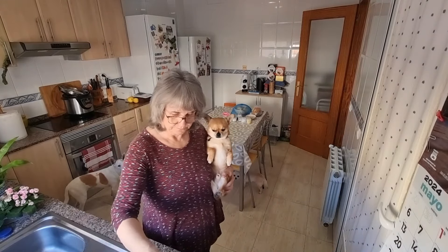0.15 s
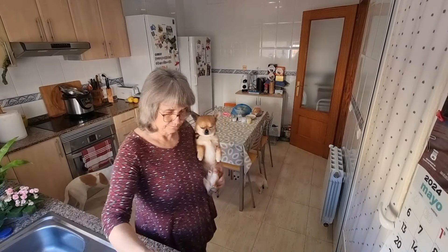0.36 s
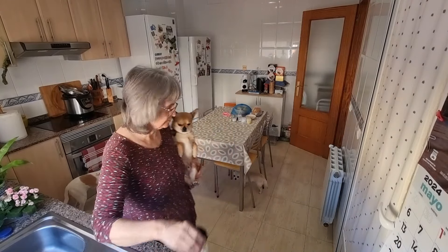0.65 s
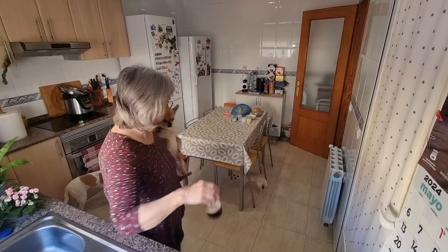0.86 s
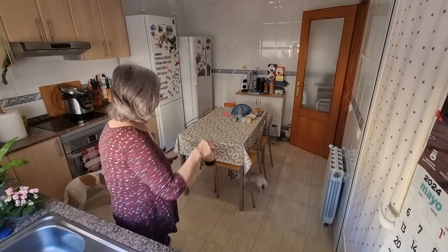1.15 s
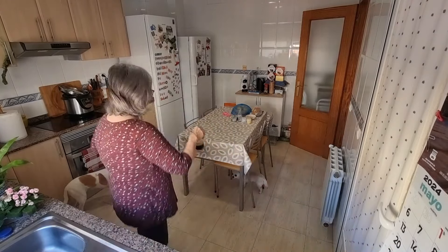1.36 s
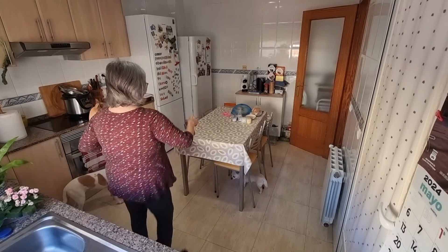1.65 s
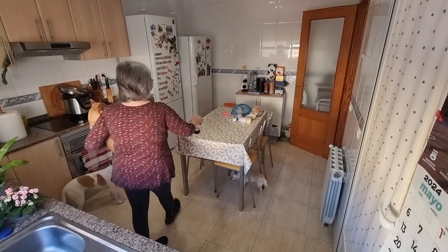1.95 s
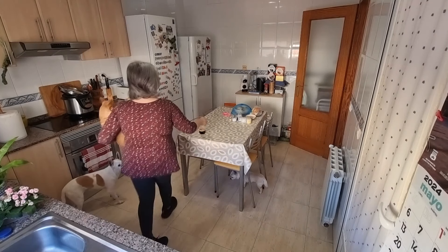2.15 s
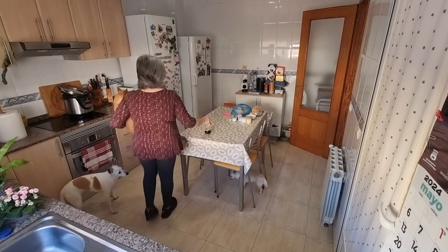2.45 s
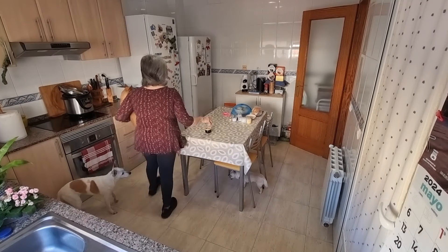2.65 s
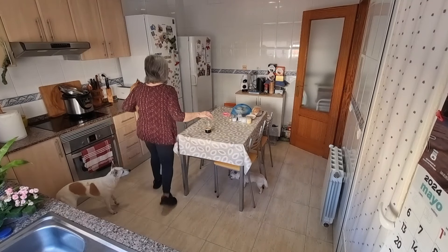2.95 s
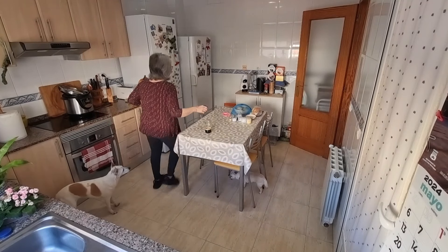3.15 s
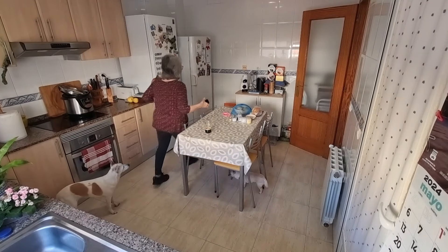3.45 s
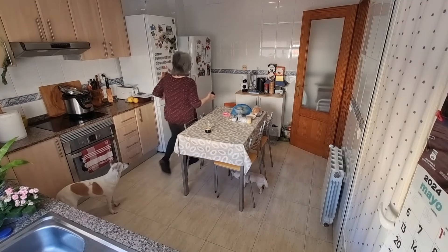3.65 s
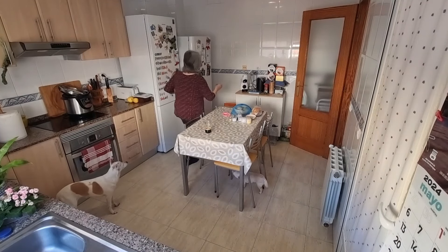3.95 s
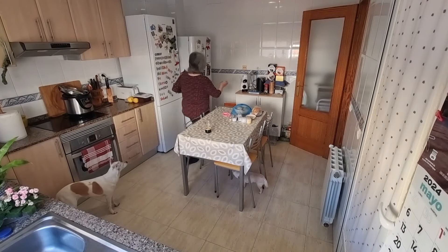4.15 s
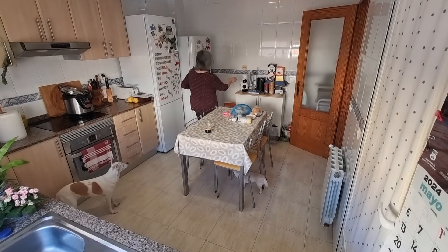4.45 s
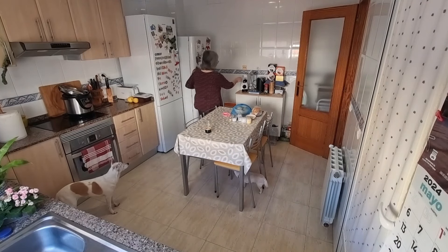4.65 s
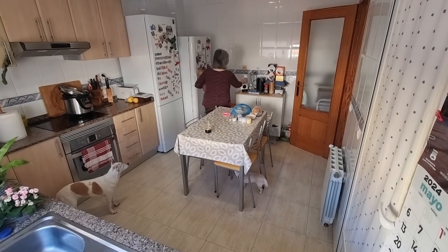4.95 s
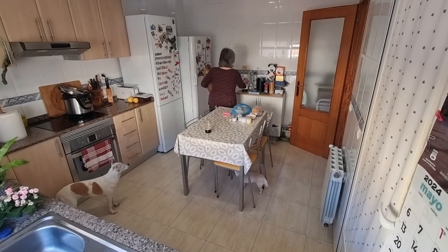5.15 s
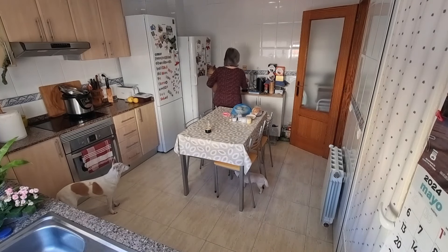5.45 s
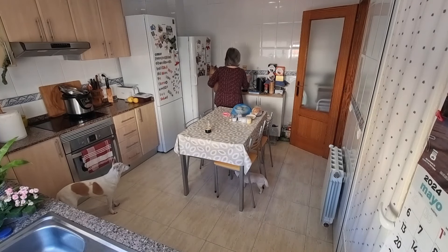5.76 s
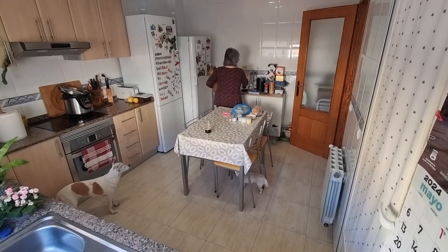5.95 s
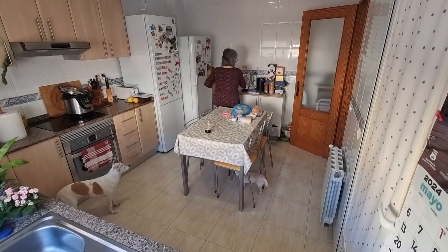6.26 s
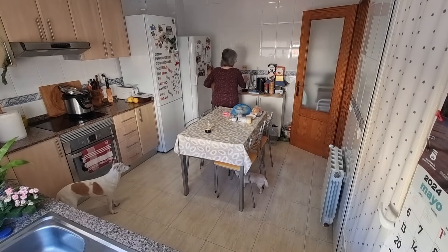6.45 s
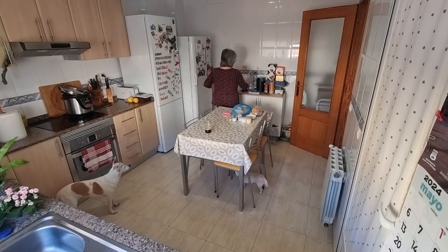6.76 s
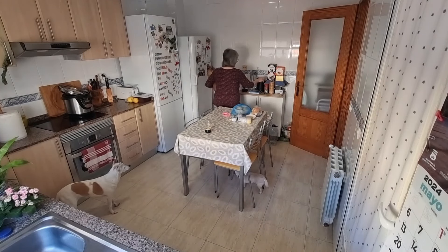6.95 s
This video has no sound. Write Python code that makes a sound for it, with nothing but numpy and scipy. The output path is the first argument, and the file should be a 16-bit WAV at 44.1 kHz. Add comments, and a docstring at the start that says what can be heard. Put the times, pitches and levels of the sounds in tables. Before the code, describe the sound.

In a quiet tiled kitchen, slippered steps and rustling clothes, then a dull cupboard thud, a farther rattling clack and a deep closing boom.

```python
"""Cupboard doors opened and shut in a small tiled kitchen: a dull thud, a farther rattle and clack as one
opens, a closing boom. Every contact excites damped panel modes and a crack that arrives mostly by way of the
hard walls. Someone shuffles about in slippers, clothes rustling: shaped bands of noise and soft resonant
footfalls. Small things tick and tap by the same contact principle; a fridge hums in wandering sines over room
noise."""
import sys
import numpy as np
from scipy.fft import rfft, irfft, next_fast_len
from scipy.io import wavfile

SR = 44100
rng = np.random.default_rng(int(sys.argv[2]) if len(sys.argv) > 2 else 0)


def transcribe(signal):
    """Save signal, clipped to [-1, 1], as a 16-bit WAV file at the path in sys.argv[1]."""
    frames = np.atleast_2d(signal).T
    limited = np.clip(frames, -1, 1)
    pcm = np.round(limited * 32767).astype(np.int16)
    wavfile.write(sys.argv[1], SR, pcm)


N = 313551  # samples in the scene
TAIL = 2 ** 15  # samples in one room response
TIME = np.arange(N) / SR
AGE = np.arange(TAIL) / SR  # seconds since a contact
TAIL_HZ = np.arange(TAIL // 2 + 1) * SR / TAIL


def doors():
    """Superposition: three wooden doors and the low room resonance pumped by the last one."""
    return thud_door() + clack_door() + shut_door() + boom()


# contacts of the dull door: start_s [s], level_db [dB], brightness [dB per octave]
THUD_HITS = [(2.461, -31, 2.5), (2.466, -41, 6), (2.483, -36.5, 1.5)]
# broad spectrum of its crack: frequency_hz [Hz], relative density [dB per Hz]
THUD_COLOUR = [(25, -30), (50, -15), (90, -6), (160, -14), (230, -3.5), (320, -8.5), (420, -11.5),
               (600, -11.5), (690, -15), (830, -15.5), (1800, -29.5), (2900, -40.5), (4500, -54.5),
               (15000, -71.5)]
# its panel modes: pitch_hz [Hz], relative level_db [dB]
THUD_MODES = [(178, -3), (221, 1.5), (241, -1.5), (261, -6), (300, -13), (350, -8.5), (384, -7.5),
              (425, -7), (511, -12), (684, -8.5), (740, -25), (883, -19), (943, -14.5), (1104, -18.5),
              (1281, -40), (1772, -27), (1949, -27), (2853, -36.5)]


def thud_door():
    """Modal excitation: close contacts drive low panel modes, heard as one dull thud."""
    return knocks(THUD_HITS, THUD_COLOUR, early_db=-32.0, modes=THUD_MODES, ring_db=1.0, sustain=0.79)


# contacts of the rattling door: start_s [s], level_db [dB], brightness [dB per octave]
CLACK_HITS = [(5.226, -50.5, -6), (5.275, -56, -5), (5.371, -47.5, -1.5), (5.396, -37, 0),
              (5.428, -34.5, -1), (5.471, -25, 2), (5.478, -23.5, -1), (5.500, -38.5, -0.5)]
# broad spectrum of its crack: frequency_hz [Hz], relative density [dB per Hz]
CLACK_COLOUR = [(65, -40), (110, -19), (188, -15), (355, -9.5), (455, -7), (547, -5.5), (619, -12.5),
                (672, -3), (1010, -4), (1320, -1), (2360, -10), (2510, -9), (4190, -14), (4940, -19.5),
                (15000, -37)]
# its panel modes: pitch_hz [Hz], relative level_db [dB]
CLACK_MODES = [(263.8, -54), (344.5, -53), (549.1, -48.5), (689.1, -47.5), (780.6, -57.5), (904.4, -44),
               (1109, -42), (1335, -50), (1453, -53.5), (1776, -45.5), (1986, -56.5), (2234, -59.5),
               (2530, -52.5), (2977, -51), (3187, -55.5)]


def clack_door():
    """Repeated impact: a farther door rattles in several contacts, its cracks stronger than its modes."""
    return knocks(CLACK_HITS, CLACK_COLOUR, early_db=-7.0, modes=CLACK_MODES, ring_db=-11.5, sustain=0.92)


# contacts of the door pushed shut: start_s [s], level_db [dB], brightness [dB per octave]
SHUT_HITS = [(6.035, -51.5, 5), (6.076, -60, 3.5), (6.183, -50.5, 1), (6.248, -30.5, 1.5), (6.254, -34, 1),
             (6.375, -58.5, -4.5)]
# broad spectrum of its crack: frequency_hz [Hz], relative density [dB per Hz]
SHUT_COLOUR = [(24, -62), (40, -12), (91, -2.5), (177, 0.5), (227, -13), (263, -4), (466, -16), (541, -11),
               (643, -17), (693, -7.5), (1000, -14), (1920, -15.5), (4450, -26.5), (4910, -32),
               (15000, -50.5)]
# its panel modes: pitch_hz [Hz], relative level_db [dB]
SHUT_MODES = [(145.3, -47), (177.6, -44), (263.8, -47), (349.9, -54.5), (543.7, -56), (678.3, -50),
              (904.4, -56.5), (1281, -60), (1534, -84), (1766, -58), (1960, -61), (2358, -70)]


def shut_door():
    """Impact radiation: contacts rich in bass, with the panel modes ringing below the crack."""
    return knocks(SHUT_HITS, SHUT_COLOUR, early_db=-8.0, modes=SHUT_MODES, ring_db=-9.0, sustain=0.96)


BOOM_S, BOOM_DB = 6.284, -40  # time and level of the peak
BOOM_RISE_DB_PER_S, BOOM_FALL_DB_PER_S = 116.5, 49
# the two lowest room resonances: pitch_hz [Hz], relative level_db [dB]
BOOM_MODES = [(97.9, -1), (107, -7.5)]


def boom():
    """Beating: two close room resonances swell as the last door swings, in step at the peak."""
    age, phase = TIME - BOOM_S, rng.random()
    fade_db = np.maximum(-BOOM_RISE_DB_PER_S * age, BOOM_FALL_DB_PER_S * age)
    waves = sum(from_db(level_db) * np.sin(2 * np.pi * (hz * age + phase)) for hz, level_db in BOOM_MODES)
    return np.sqrt(2) * from_db(BOOM_DB - fade_db) * waves


def knocks(hits, colour, early_db, modes=(), ring_db=0, sustain=1, early_t60=0.12, ripple_db=2.0, ripple_hz=90):
    """Impact excitation: each contact sends a crack into the room and sets the panel's modes ringing."""
    out = np.zeros((2, N + TAIL))
    phases = rng.random(len(modes))
    # crowded, quickly damped upper modes ripple the body's spectrum
    ripple = ripple_db * wiggle(TAIL_HZ / ripple_hz) * np.minimum(TAIL_HZ / 2000, 1)
    body_db = at_hz(colour, TAIL_HZ) + ripple
    for start_s, level_db, brightness in hits:
        crack = causal(body_db + hardness(TAIL_HZ, brightness))
        room = rfft(kitchen(early_db, early_t60))
        sound = onset_one(irfft(room * crack))
        if len(modes):
            ring = ringing(modes, phases, start_s, brightness, sustain)
            sound = onset_one(sound + from_db(ring_db) * ring)
        start = round(start_s * SR)
        out[:, start:start + TAIL] += from_db(level_db) * sound
    return out[:, :N]


def pitched_knocks(rows, colour, early_db, early_t60, ring_db, sustain):
    """Single-mode resonance: each small knock wakes one resonance of its own."""
    return sum(knocks([(start_s, level_db, brightness)], colour, early_db, [(hz, 0)], ring_db, sustain, early_t60)
               for start_s, level_db, hz, brightness in rows)


def ringing(modes, phases, start_s, brightness, sustain, swell_s=0.0037):
    """Modal decay: damped sines, their phase continuous across contacts, held by the room."""
    out = 0
    for k, ((hz, level_db), phase) in enumerate(zip(modes, phases)):
        # the wider the sound field at this pitch, the further apart the phases at the two ports
        apart = np.arctan(from_db(at_hz(WIDTH, hz))) * (-1) ** k * np.array([[1], [-1]])
        wave = np.sin(2 * np.pi * (hz * (start_s + AGE) + phase) + apart)
        decay = np.exp(-np.log(1000) * AGE / (sustain * at_hz(ROOM_T60, hz)))
        out = out + from_db(level_db + hardness(hz, brightness)) * decay * wave
    return onset_one(out * (1 - np.exp(-AGE / swell_s)))


def hardness(hz, brightness):
    """Contact stiffness: a harder contact tilts the spectrum upwards (dB, zero at 1 kHz)."""
    return brightness * np.log2(np.clip(hz, 100, 10000) / 1000)


def causal(level_db):
    """Minimum phase: a filter with the given gains that sounds nothing before the contact."""
    cepstrum = irfft(np.log(from_db(level_db)))
    cepstrum[1:TAIL // 2] *= 2
    cepstrum[TAIL // 2 + 1:] = 0
    return np.exp(rfft(cepstrum))


def onset_one(x):
    """Onset normalization: the first 40 ms get unit rms."""
    return x / np.sqrt(np.mean(x[:, AGE < .04] ** 2))


def walker():
    """Superposition: footfalls, friction of cloth and soles, thin squeaks and a low rumble."""
    return footfalls() + rustle() + squeaks() + rumble()


# soft footfalls and bumps: start_s [s], level_db [dB], pitch_hz [Hz], brightness [dB per octave]
STEPS = [(2.818, -54.5, 380, 0), (2.886, -55.5, 436, 3), (2.912, -53.5, 110, 0.5), (3.084, -55.5, 230, 2.5),
         (3.368, -61, 264, 4), (3.40, -56, 179, -4), (3.493, -56, 260, 4.5), (3.702, -47, 178.3, 1.5),
         (4.119, -53.5, 228, -2.5), (4.376, -57, 151.2, 2), (4.690, -55.5, 230, -3.5),
         (4.826, -53.5, 292, -0.5), (6.050, -51, 278, 2.5), (6.972, -72, 242, 2.5)]
# their broad spectrum: frequency_hz [Hz], relative density [dB per Hz]
STEP_COLOUR = [(35, -43), (60, -11), (130, -2.5), (227, -5), (378, -13.5), (413, -13.5), (719, -14.5),
               (1250, -21), (3100, -27.5), (3390, -39), (12000, -51.5), (15600, -73), (22000, -120)]


def footfalls():
    """Soft impact: each step is a dark crack with one damped resonance."""
    return pitched_knocks(STEPS, STEP_COLOUR, early_db=-8.0, early_t60=0.093, ring_db=-4.5, sustain=0.64)


# strokes of slippers and clothes: peak_s [s], build_up_s [s], then levels of swish, scuff and
# fine hiss [dB, before the trims of rustle()]
RUSTLE = [(0.008, 0.072, -53.5, -51.5, -85), (0.069, 0.034, -58.5, -77, -63.5),
          (0.676, 0.062, -54, -61.5, -85), (1.35, 0.079, -69.5, -70, -77), (1.48, .08, -61.5, -70, -70),
          (1.88, 0.14, -79.5, -97, -78), (2.085, .025, -59.5, -80, -71), (2.17, 0.094, -63, -66.5, -83),
          (2.27, 0.13, -57.5, -63, -64), (2.43, 0.091, -60, -60, -66), (2.74, 0.07, -70, -70, -75),
          (2.885, 0.092, -56, -64, -69), (3.05, 0.15, -63.5, -67.5, -72), (3.385, 0.034, -68.5, -63, -71),
          (3.5, .1, -62.5, -60.5, -66), (3.615, 0.043, -58.5, -63.5, -64), (3.85, 0.12, -77, -78, -74),
          (4.13, 0.059, -63.5, -71.5, -70), (4.255, 0.042, -64.5, -74, -70), (4.32, .04, -63.5, -69, -71),
          (4.385, .02, -66, -64.5, -76), (4.74, 0.031, -72, -83, -66), (4.82, 0.06, -63.5, -74, -66),
          (5.0, 0.059, -62, -78, -71), (5.095, 0.04, -56, -71, -78), (5.35, 0.087, -72, -59.5, -77),
          (5.899, 0.023, -53.5, -65, -67), (6.2, 0.053, -53.5, -56, -74), (6.64, 0.15, -73, -84, -73.5),
          (6.74, 0.056, -79.5, -90, -75), (6.93, 0.022, -82, -81.5, -84.5)]
# spectra of the three: frequency_hz [Hz], relative density [dB per Hz]
SWISH_COLOUR = [(1000, -32.5), (2000, 0), (3000, 3.5), (4400, -3), (6000, -10), (9000, -13.5),
                (11000, -16.5), (15000, -20.5)]
SCUFF_COLOUR = [(200, -17.5), (450, -4.5), (800, -1.5), (1700, -7.5), (2400, -12.5), (5000, -34.5)]
HISS_COLOUR = [(3000, -20), (6000, 2.5), (8500, 0), (11000, 1), (15000, -2.5)]


def rustle(swish_db=-0.5, scuff_db=3.0, grain_db=0.5, grain_hz=170):
    """Friction noise: three noise bands follow each stroke and share a fine random grain in level."""
    grain = from_db(grain_db * drift(grain_hz))
    peak_s, build_s, swishes, scuffs, hisses = np.transpose(RUSTLE)
    swish = strokes(zip(peak_s, build_s, swishes + swish_db)) * noise(SWISH_COLOUR)
    scuff = strokes(zip(peak_s, build_s, scuffs + scuff_db)) * noise(SCUFF_COLOUR)
    hiss = strokes(zip(peak_s, build_s, hisses)) * noise(HISS_COLOUR)
    return grain * (swish + scuff + hiss)


# something rubs thinly: peak_s [s], build_up_s [s], level_db [dB, before the trim of squeaks()]
SQUEAK = [(0.006, 0.022, -56.5), (2.895, 0.042, -51), (2.94, .02, -60)]
# its narrow spectrum: frequency_hz [Hz], relative density [dB per Hz]
SQUEAK_COLOUR = [(2000, -60), (2600, -13), (2780, -20), (2850, 0.5), (2930, 1), (3250, -30), (3900, -47)]


def squeaks(trim_db=1.5):
    """Narrow-band noise: a rub confined to a narrow band is heard as a thin squeak."""
    return from_db(trim_db) * strokes(SQUEAK) * noise(SQUEAK_COLOUR)


# low rumble under the first strides: peak_s [s], build_up_s [s], level_db [dB]
RUMBLE = [(2.08, 0.092, -56.5), (2.45, 0.13, -53.5)]
# its spectrum: frequency_hz [Hz], relative density [dB per Hz]
RUMBLE_COLOUR = [(25, -30), (50, -26), (75, -3), (120, -9), (250, -22), (1000, -59)]


def rumble():
    """Low-band noise: bass swells with the strokes."""
    return strokes(RUMBLE) * noise(RUMBLE_COLOUR)


SET_IN_DB_PER_S, BUILD_UP_DB, DIE_AWAY_DB_PER_S = 304, 9, 122.5


def strokes(rows):
    """Power addition: rubs set in, gather speed to a peak and die away with the room; overlaps add in power."""
    power = 0
    for peak_s, build_s, level_db in rows:
        before = np.maximum(peak_s - TIME, 0)
        after = np.maximum(TIME - peak_s, 0)
        build_up = BUILD_UP_DB * np.minimum(before / build_s, 1)
        set_in = SET_IN_DB_PER_S * np.maximum(before - build_s, 0)
        fade_db = np.minimum(build_up + set_in + DIE_AWAY_DB_PER_S * after, 120)
        power = power + from_db(level_db - fade_db) ** 2
    return np.sqrt(power)


def handling():
    """Superposition: ticks and hollow taps of small things being moved."""
    return ticks() + taps()


# small sharp ticks: start_s [s], level_db [dB], brightness [dB per octave]
TICKS = [(2.296, -59, -2), (3.022, -66, 2), (3.157, -68.5, 7), (3.605, -59.5, 2), (4.205, -58, -3),
         (4.231, -58, -1), (4.696, -72.5, 7), (4.80, -66.5, 13), (4.955, -65, 0), (5.045, -58, 0),
         (5.142, -62, -4.5), (5.859, -65, 10), (5.882, -56.5, 3.5)]
# their spectrum: frequency_hz [Hz], relative density [dB per Hz]
TICK_COLOUR = [(300, -21.5), (1200, -10), (2500, -5), (4000, 0.5), (7000, -8), (10000, -11.5),
               (15000, -15.5)]


def ticks():
    """Broadband impact: a strong, brief first sound without a panel resonance."""
    return knocks(TICKS, TICK_COLOUR, early_db=5.0, early_t60=0.032)


# light taps on the worktop: start_s [s], level_db [dB], pitch_hz [Hz], brightness [dB per octave]
TAPS = [(0.241, -58.5, 736, -6), (0.747, -53.5, 588.6, 3), (1.051, -64.5, 640, -12.5),
        (2.049, -65.5, 616, -3.5), (2.082, -62, 657, 0)]
# their spectrum: frequency_hz [Hz], relative density [dB per Hz]
TAP_COLOUR = [(200, -27), (430, -0.5), (620, 15.5), (1100, -1.5), (1900, -1.5), (3000, -27), (10000, -77)]


def taps():
    """Single-mode resonance: a strong, brief first sound and one hollow ring."""
    return pitched_knocks(TAPS, TAP_COLOUR, early_db=14.0, early_t60=0.039, ring_db=-5.5, sustain=0.68)


# compressor lines: pitch_hz [Hz], level_db [dB]
HUM = [(96.9, -67.5), (118.4, -72.5), (231.5, -74), (425.3, -82.5)]


def fridge():
    """Tonal radiation: compressor lines, each a sine with a slightly wandering phase."""
    return sum(from_db(level_db) * tone(hz, wander_rad=0.29, wander_hz=7.5) for hz, level_db in HUM)


def tone(hz, wander_rad, wander_hz):
    """Phase modulation: a sine of unit rms whose phase wanders at random."""
    return np.sqrt(2) * np.sin(2 * np.pi * (hz * TIME + rng.random()) + wander_rad * drift(wander_hz))


# spectrum of the room tone: frequency_hz [Hz], relative density [dB per Hz]
AIR = [(15, -52), (25, -19.5), (69, -5.5), (106, -3.5), (163, -4), (196, -19.5), (219, -11), (264, -8.5),
       (344, -13), (475, -25), (655, -20), (769, -27), (952, -20), (1030, -29.5), (2000, -36.5),
       (15000, -41.5)]


def room_tone(air_db=-61.0):
    """Stationary noise: the low rush of the room."""
    return from_db(air_db) * noise(AIR)


def noise(colour):
    """Spectral shaping: steady diffuse noise of a given colour, rms 1."""
    hz, spectrum = diffuse(2 * next_fast_len(N // 2 + 1))
    return rms_one(irfft(spectrum * from_db(at_hz(colour, hz)))[:, :N])


# reverberation: frequency_hz [Hz], time to fall by 60 dB [s]
ROOM_T60 = [(60, 0.78), (200, 0.54), (600, 0.52), (1500, 0.42), (4000, 0.46), (8000, 0.37), (15000, 0.34)]


def kitchen(early_db, early_t60, build_s=0.0019, lumps_db=1.0, lumps_hz=700, blend_s=0.044):
    """Reverberation: an uneven early part blends into a dense tail that dies band by band."""
    hz, spectrum = diffuse(TAIL)
    centres = np.geomspace(60, 15000, 8)
    tail = 0
    for centre, share in zip(centres, np.eye(len(centres))):
        band = irfft(spectrum * at_hz(np.c_[centres, share], hz))
        tail = tail + band * np.exp(-np.log(1000) * AGE / at_hz(ROOM_T60, centre))
    early = from_db(early_db) * np.exp(-np.log(1000) * AGE / early_t60)
    lumps = from_db(lumps_db * wiggle(AGE * lumps_hz) * np.exp(-AGE / blend_s))
    return tail * lumps * (1 + early) * (1 - np.exp(-AGE / build_s))


# stereo width: frequency_hz [Hz], side over mid [dB]
WIDTH = [(60, -19.5), (120, -20.5), (200, -27), (380, -3.5), (700, 1), (1300, 1.5), (2400, -1), (15000, 1)]


def diffuse(size):
    """Diffuse field: white sound from all sides, whose bass is nearly the same at both ports."""
    hz = np.arange(size // 2 + 1) * SR / size
    mid, side = rfft(rng.standard_normal((2, size)))
    width = from_db(at_hz(WIDTH, hz))
    return hz, (mid + width * side * [[1], [-1]]) / np.sqrt(1 + width ** 2)


def drift(rate_hz):
    """Random modulation: smooth chance in time."""
    return wiggle(TIME * rate_hz)


def wiggle(steps):
    """Interpolated chance: spread 1, a new random value at every whole step."""
    knots = rng.standard_normal(4096)
    return rms_one(np.interp(steps, np.arange(len(knots)), knots))


def from_db(db):
    """Level law: decibels to amplitude gain."""
    return 10 ** (np.asarray(db) / 20)


def rms_one(x):
    """Power normalization: scale to unit rms."""
    return x / np.sqrt(np.mean(x ** 2) + 1e-20)


def at_hz(points, hz):
    """Logarithmic pitch scale: read a table along log frequency."""
    points = np.array(points)
    return np.interp(np.log(np.maximum(hz, 1)), np.log(points[:, 0]), points[:, 1])


def scene():
    """Superposition: everything as it arrives at the microphone."""
    return doors() + walker() + handling() + fridge() + room_tone()


# microphone response: frequency_hz [Hz], gain [dB]
MICROPHONE = [(60, 0), (3200, 0), (4200, 1.5), (5000, 1.5), (7200, 1.5), (9000, 0), (11200, -2.5),
              (14500, 1)]
# balance of its two ports: frequency_hz [Hz], left over right [dB]
PORTS = [(60, 1), (110, -1.5), (200, -3), (380, -3.5), (700, 3.5), (1290, -4.5), (2380, -0.5), (4400, -4),
         (8120, 0.5), (15000, -3)]
CUTOFF_HZ = 15350


def record(dry):
    """Linear filtering: the microphone colours each port slightly differently and cuts the top steeply."""
    size = 2 * next_fast_len(N // 2 + TAIL)
    hz = np.arange(size // 2 + 1) * SR / size
    ports = from_db(at_hz(MICROPHONE, hz) + at_hz(PORTS, hz) * np.array([[.5], [-.5]]))
    low_pass = 1 / np.sqrt(1 + (hz / CUTOFF_HZ) ** 400)
    return irfft(rfft(dry, size) * ports * low_pass)[:, :N]


dry = scene()
out = record(dry)
transcribe(out)
```